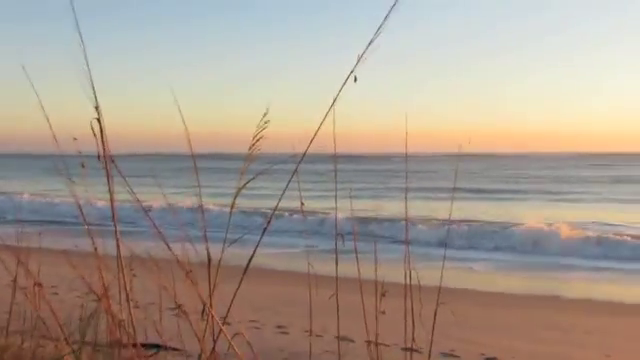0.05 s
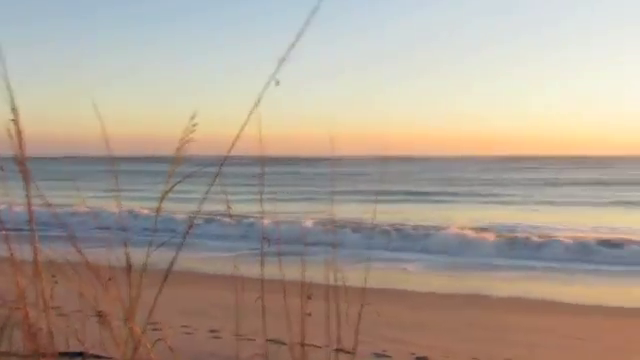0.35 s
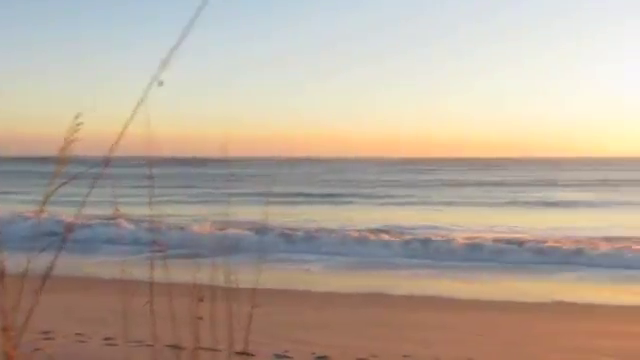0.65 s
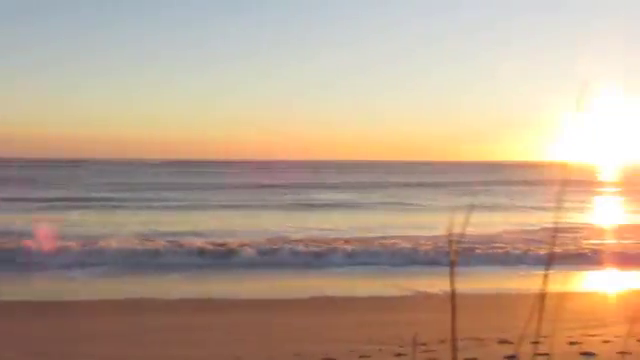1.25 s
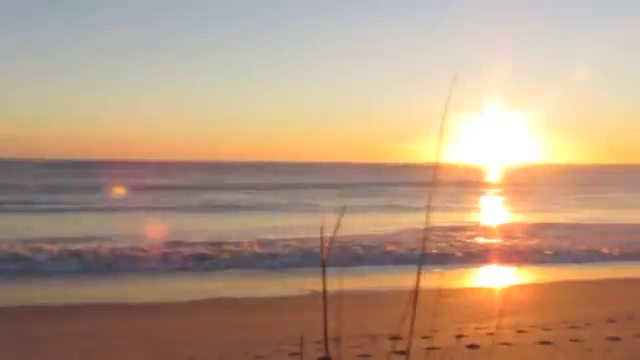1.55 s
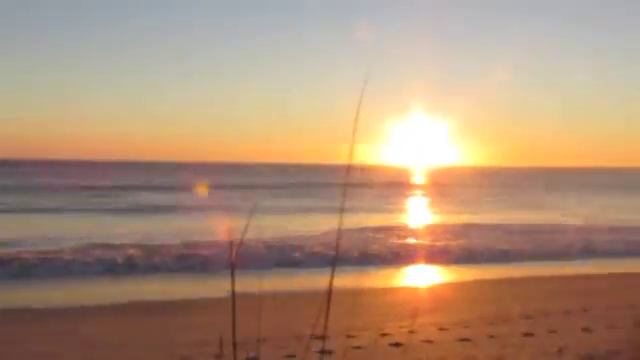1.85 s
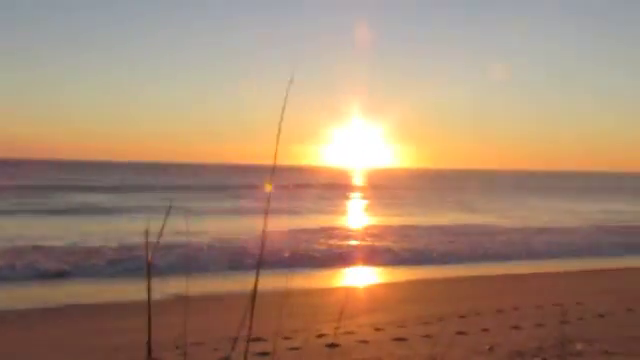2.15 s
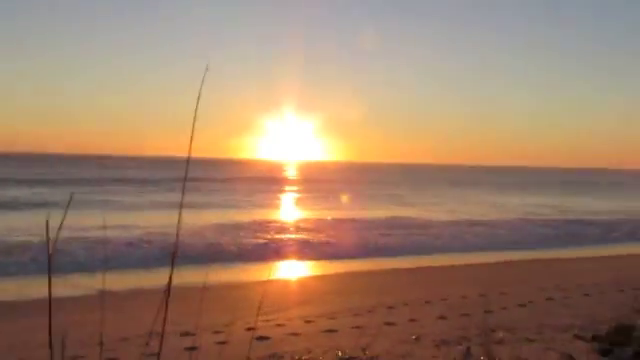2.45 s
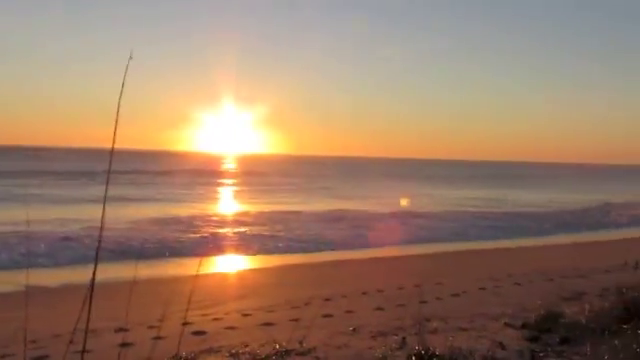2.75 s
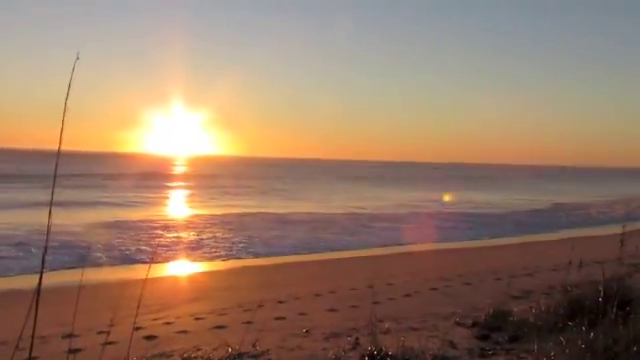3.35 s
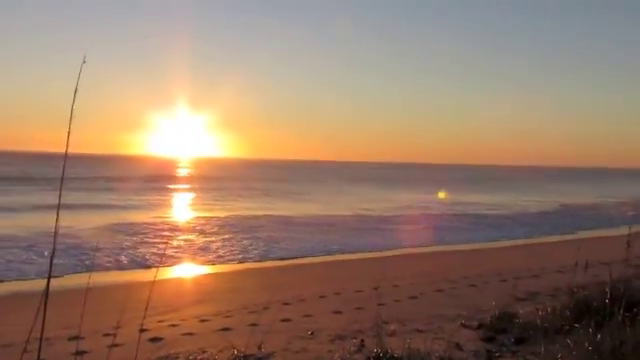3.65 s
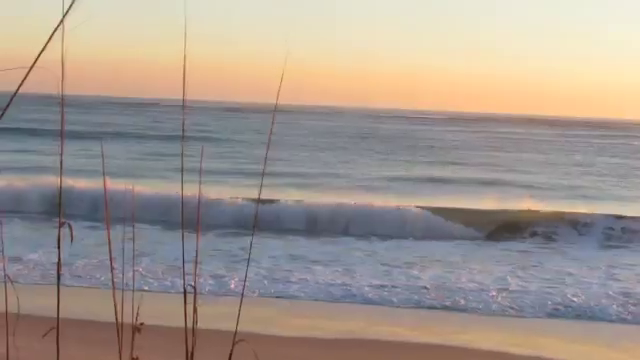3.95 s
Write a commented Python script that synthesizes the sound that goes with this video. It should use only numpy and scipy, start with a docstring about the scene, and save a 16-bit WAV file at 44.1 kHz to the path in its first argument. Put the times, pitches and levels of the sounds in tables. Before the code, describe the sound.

A sea wave breaks with a low roar, then fades to foamy hiss amid light wind buffets.

```python
"""Surf on a sandy beach, heard from the dune; light wind buffets the microphone throughout.
First a breaker collapses with the low roar of trapped air. From about 1 s the microphone turns
along the shore and the surf shifts left, while the wave runs up the sand as churning water,
ringing bubbles and hissing foam. It dies away; the sound stops abruptly at 3.87 s."""
import sys
import numpy as np
from scipy import signal
from scipy.fft import rfft, irfft
from scipy.io import wavfile

SR = 44100
rng = np.random.default_rng(int(sys.argv[2]) if len(sys.argv) > 2 else 0)


def digitize_waveform(pressure):
    """Quantize a signal to 16-bit integers and store it at the path in sys.argv[1].

    Rows of a 2-D input are taken as channels; values are limited to [-1, 1].
    """
    field = np.atleast_2d(pressure).T
    bounded = np.clip(field, -1, 1)
    quanta = np.round(bounded * 32767).astype(np.int16)
    wavfile.write(sys.argv[1], SR, quanta)


N = 176400
TIME_S = np.arange(N) / SR
FREQS_HZ = np.maximum(np.arange(N // 2 + 1) * SR / N, 1)

# Envelope of splash and bubbles. Each row: time in seconds, level in dB before trim.
SPLASH_ENVELOPE = [(0, -42.5), (0.4, -37.5), (0.7, -37), (0.95, -36), (1.2, -37), (1.62, -34.5),
                   (2.25, -36), (2.6, -37), (2.95, -38.5), (3.3, -40.5), (3.85, -44.5)]
# Surf balance before and after the turn. Each row: frequency in Hz, left minus right in dB.
PAN_FACING = [(60, 6), (220, 5), (600, 2.5), (860, 1.5), (1100, 0), (2000, -1), (6000, 0.5), (9000, .7)]
PAN_TURNED = [(60, 5.5), (400, 5.6), (880, 4.27), (1100, 7.2), (1380, 3), (1750, 4.5), (2800, 3), (4800, 1),
              (6300, 1), (7800, 2.1), (13000, 1)]


def from_db(db):
    """Decibels to gain."""
    return np.exp(np.asarray(db) * np.log(10) / 20)


def unit_rms(x):
    """Scale to an rms of 1."""
    return x / np.sqrt(np.mean(x ** 2) + 1e-20)


def over_time(rows):
    """Read a table at every sample."""
    return np.interp(TIME_S, *np.transpose(rows))


def at_hz(rows, hz):
    """Read a table on a log-frequency axis."""
    freqs_hz, values = np.transpose(rows)
    return np.interp(np.log(hz), np.log(freqs_hz), values)


def noise_spectra(shape):
    """Spectra of two independent unit-rms noises, falling steeply beyond the table's ends."""
    skirts = np.minimum(FREQS_HZ / shape[0][0], 1) * np.minimum(shape[-1][0] / FREQS_HZ, 1)
    gains = unit_rms(from_db(at_hz(shape, FREQS_HZ)) * skirts ** 8)
    return rfft(rng.standard_normal((2, N))) * gains


def drift(corner_hz):
    """Slow random wander, rms 1."""
    hop, settle = 40, 2000
    pole = np.exp(-2 * np.pi * corner_hz * hop / SR)
    noise = rng.standard_normal(N // hop + settle + 2)
    slow = signal.lfilter([1], [1, -2 * pole, pole * pole], noise)[settle:]
    return np.interp(np.arange(N) / hop, np.arange(len(slow)), unit_rms(slow))


def pan(left_db):
    """Left and right gains with a mean of 1."""
    ratio = from_db(left_db)
    return np.reshape([2 * ratio / (1 + ratio), 2 / (1 + ratio)], (2, -1))


def turning(facing, turned, hz, turn_s=1.3):
    """A stereo property at one frequency as the microphone turns."""
    # Each row: frequency in Hz, midpoint of its shift in seconds.
    midpoints = [(600, 1.2), (1100, 1.2), (1700, 1.23), (2800, 2.1), (5000, 2.2), (8000, 0.97),
                 (12000, 1.4)]
    progress = (TIME_S - at_hz(midpoints, hz)) / turn_s
    return np.interp(progress, [-0.5, 0.5], [at_hz(facing, hz), at_hz(turned, hz)])


def turning_tone(surf, start_s=1.1, end_s=2.3):
    """Ripples in the surf's spectrum give way to others as the microphone turns."""
    # Each row: frequency in Hz, gain in dB.
    eq_facing = [(120, -0.5), (250, -0.5), (420, -0.5), (620, -2.7), (820, 1), (1080, -1.5), (1650, 1),
                 (1900, -2.5), (2170, 0.8), (2550, -1.5), (3200, -1.5), (3620, 0.3), (4100, -0.2),
                 (5200, 0.2), (6300, .5), (9000, 0)]
    eq_turned = [(160, 0.5), (215, -2.5), (290, 0.5), (400, 0.1), (590, 1.6), (690, -1), (800, -1),
                 (880, -3.1), (1080, 2.2), (1370, -1), (1600, 0.5), (2200, 0.1), (2800, 0.4), (3700, -0.5),
                 (4700, 1.2), (7000, -0.5), (10500, -0.9), (14000, -1)]
    facing = irfft(rfft(surf) * from_db(at_hz(eq_facing, FREQS_HZ)), N)
    turned = irfft(rfft(surf) * from_db(at_hz(eq_turned, FREQS_HZ)), N)
    share = np.interp(TIME_S, [start_s, end_s], [0, 1])
    return (1 - share) * facing + share * turned


def wind(breeze_db=-43.5, correlation=-0.96):
    """Short buffets over a faint breeze push the two microphone ports mostly in opposite directions."""
    # Each row: frequency in Hz, relative density in dB.
    spectrum = [(15, -32.5), (25, -15), (45, -14.5), (70, 1.5), (100, 9), (130, -13), (190, -4),
                (300, -20.5), (500, -29)]
    # Each row: centre in seconds, length in seconds, level in dB.
    buffets = [(.72, 0.074, -21), (1.033, 0.049, -18), (1.104, 0.045, -16), (1.163, 0.079, -15.5),
               (1.327, 0.034, -26), (2.2, .04, -37), (2.885, .04, -30), (2.997, 0.029, -28),
               (3.538, 0.083, -35), (3.63, 0.052, -25.5), (3.816, 0.038, -26.5)]
    mid, side = irfft(noise_spectra(spectrum), N)
    rumble = np.sqrt((1 + correlation) / 2) * mid + np.sqrt((1 - correlation) / 2) * side * [[1], [-1]]
    gusts = sum(from_db(db) * np.exp(-(2 * (TIME_S - centre_s) / length_s) ** 2)
                for centre_s, length_s, db in buffets)
    return rumble * (from_db(breeze_db) + gusts) * pan(left_db=3)


def bubbles(per_s=400, low_hz=814, high_hz=2380, pitches=16, ring_cycles=36, spread_db=3, trim_db=-11.5):
    """Single larger bubbles ring briefly inside the splash."""
    strengths = from_db(spread_db * np.minimum(rng.exponential(1, N), 4)) * rng.choice([-1, 1], N)
    kicks = strengths * (rng.random(N) < per_s / SR)
    pitch_index = rng.integers(0, pitches, N)
    ringing = 0
    for k, hz in enumerate(np.geomspace(low_hz, high_hz, pitches)):
        radius = np.exp(-np.log(1000) * hz / (ring_cycles * SR))  # -60 dB after ring_cycles
        resonator = [1, -2 * radius * np.cos(2 * np.pi * hz / SR), radius * radius]
        ringing += signal.lfilter([1 / hz, 0, -1 / hz], resonator, kicks * (pitch_index == k) + 1e-18)
    left_db = turning(PAN_FACING, PAN_TURNED, np.sqrt(low_hz * high_hz))
    return unit_rms(ringing) * from_db(over_time(SPLASH_ENVELOPE) + trim_db) * pan(left_db)


def white_water(spectrum, envelope, trim_db, swell_db, flicker_db):
    """Countless merged bubbles: third-octave bands that surge together and flicker on their own."""
    # Each row: frequency in Hz, left-right correlation.
    correlation_facing = [(50, 0.6), (170, 1), (350, 0.8), (550, 0.87), (850, 0.9), (1100, 0.78),
                          (1600, 0.99), (2600, 1), (5300, 1), (6300, 1), (7500, .55), (11000, .38)]
    correlation_turned = [(50, 1), (170, 0.99), (500, 0.92), (850, 0.94), (1100, 0.89), (1600, 0.97),
                          (2600, 0.98), (4500, 1), (5600, 0.84), (7000, 0.4), (11000, .03), (14000, -0.27)]
    noise = noise_spectra(spectrum)
    thirds = 3 * np.log2(FREQS_HZ)
    first, last = np.interp([spectrum[0][0], spectrum[-1][0]], FREQS_HZ, thirds)
    water = 0
    for k in range(int(first), int(last) + 2):
        hz = 2 ** (k / 3)
        mid, side = irfft(noise * np.maximum(1 - np.abs(thirds - k), 0), N)
        correlation = turning(correlation_facing, correlation_turned, hz)
        band = mid + np.sqrt((1 - correlation) / (1 + correlation)) * side * [[1], [-1]]
        flicker = from_db(flicker_db * drift(corner_hz=12))
        water += band * pan(turning(PAN_FACING, PAN_TURNED, hz)) * flicker
    return water * from_db(over_time(envelope) + trim_db + swell_db * drift(corner_hz=2.3))


def breaker():
    """Trapped air rumbles and roars; the bore churns, splashes and sprays; swash rings, foam hisses."""
    # Layer spectra. Each row: frequency in Hz, relative density in dB.
    rumble_spectrum = [(20, -27), (30, -15.5), (45, -14), (65, -2.5), (78, -2.5), (98, -2.5), (120, -13)]
    roar_spectrum = [(88, -19.5), (118, 0.05), (160, 0.36), (255, -1.43), (300, -3.5), (450, -7),
                     (570, -12.5), (640, -17), (700, -28.5)]
    churn_spectrum = [(660, -29.5), (730, -7.5), (790, -3), (880, 1), (960, -1.5), (1080, -6.5),
                      (1280, -2.5), (1400, -4), (1540, -8), (1750, -29)]
    splash_spectrum = [(1350, -21), (1580, 0.5), (1950, -1.5), (2400, -7.5), (2850, -31)]
    spray_spectrum = [(2150, -11), (2520, -0.5), (2850, -1), (3250, -5.5), (3620, -6), (4100, -9),
                      (4800, -32.5)]
    swash_spectrum = [(1180, -21), (1290, -11), (1360, -0.5), (1440, -5), (1580, -18)]
    foam_spectrum = [(3600, -22.5), (4250, 1.5), (5000, -0.5), (6300, -0.5), (8600, -3.5), (10500, -8),
                     (13200, -14.5), (15000, -21), (15700, -37)]
    # Layer envelopes. Each row: time in seconds, level in dB before trim.
    rumble_envelope = [(0, -24.5), (0.35, -21.5), (0.8, -22), (1.02, -20.5), (1.25, -25.5), (1.6, -30),
                       (2.05, -24), (2.4, -34), (2.8, -29.5), (3.3, -28.5), (3.85, -34)]
    roar_envelope = [(0, -17.5), (0.3, -16), (0.6, -17), (0.78, -16), (1, -17.5), (1.15, -20.4), (1.7, -20),
                     (2.2, -23.5), (2.4, -22.5), (2.65, -25.5), (3.1, -29.5), (3.25, -27.5), (3.5, -30),
                     (3.6, -28), (3.85, -31)]
    churn_envelope = [(0, -33.0), (0.3, -28), (1, -27.5), (1.2, -29), (1.7, -28.5), (2, -28), (2.4, -31),
                      (2.8, -32.5), (3.2, -34.5), (3.85, -38.5)]
    spray_envelope = [(0, -41), (0.35, -38.5), (0.75, -39.5), (0.98, -39), (1.2, -43.5), (1.6, -41),
                      (2.1, -42.5), (2.55, -43), (2.8, -44), (3.3, -46), (3.85, -47.7)]
    swash_envelope = [(0, -60), (0.9, -39), (1.3, -46), (1.9, -48), (2.25, -37), (2.45, -40.5),
                      (2.72, -34.5), (3.0, -39.5), (3.35, -48), (3.85, -50.5)]
    foam_envelope = [(0, -43.5), (0.3, -40.5), (0.82, -41), (0.96, -39.5), (1.1, -43.5), (1.22, -44),
                     (1.45, -43), (1.9, -44.0), (2.3, -45.5), (2.5, -47), (2.9, -49), (3.3, -52),
                     (3.85, -53)]
    rumble = white_water(rumble_spectrum, rumble_envelope, trim_db=-3.5, swell_db=0.5, flicker_db=-0.6)
    roar = white_water(roar_spectrum, roar_envelope, trim_db=0.7, swell_db=-0.08, flicker_db=0.86)
    churn = white_water(churn_spectrum, churn_envelope, trim_db=-0.16, swell_db=-0.25, flicker_db=0.63)
    splash = white_water(splash_spectrum, SPLASH_ENVELOPE, trim_db=0.18, swell_db=-0.24, flicker_db=0.9)
    spray = white_water(spray_spectrum, spray_envelope, trim_db=0, swell_db=-0.5, flicker_db=0.45)
    swash = white_water(swash_spectrum, swash_envelope, trim_db=-1.5, swell_db=4, flicker_db=-3)
    foam = white_water(foam_spectrum, foam_envelope, trim_db=-0.14, swell_db=0.46, flicker_db=0.03)
    return rumble + roar + churn + splash + spray + swash + foam


def scene():
    """The wave and the wind."""
    return turning_tone(breaker() + bubbles()) + wind()


def record(dry, ceiling=0.85, stop_s=3.868, fade_s=0.002, stopband_hz=16050):
    """Soft clip, abrupt stop, steep low-pass."""
    rounded = dry / (1 + (dry / ceiling) ** 6) ** (1 / 6)
    gate = np.clip((stop_s - TIME_S) / fade_s, 0, 1)
    lowpass = signal.cheby2(16, 60, stopband_hz, fs=SR, output="sos")
    return signal.sosfilt(lowpass, rounded * gate)


dry = scene()
out = record(dry)
digitize_waveform(out)
```